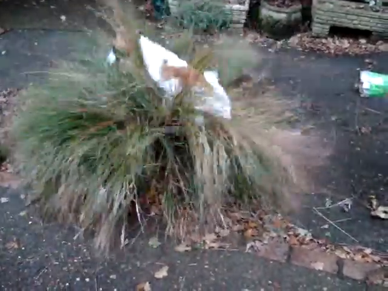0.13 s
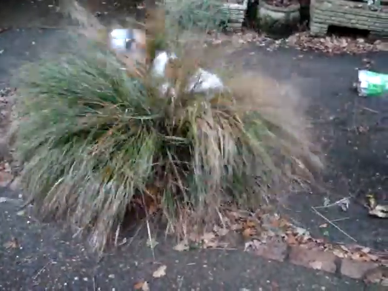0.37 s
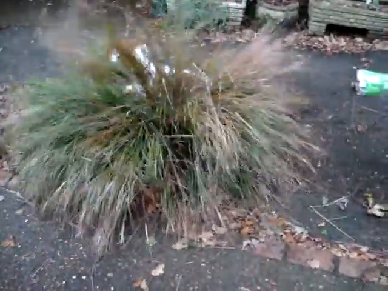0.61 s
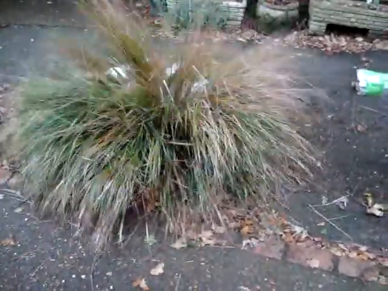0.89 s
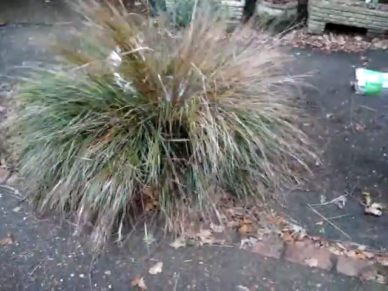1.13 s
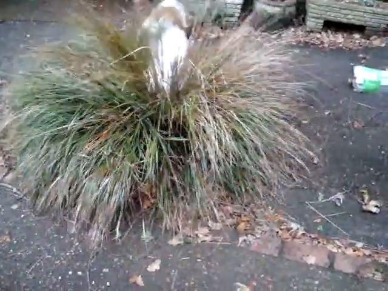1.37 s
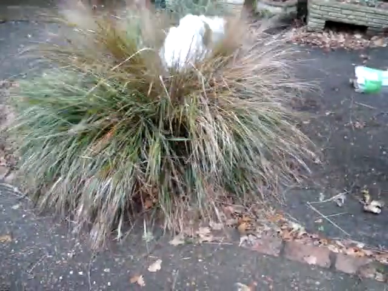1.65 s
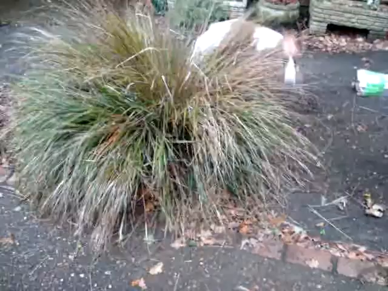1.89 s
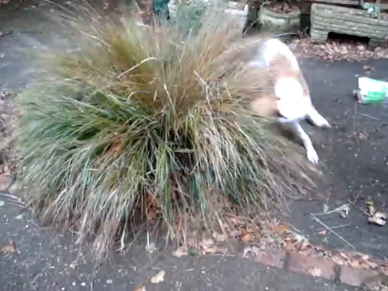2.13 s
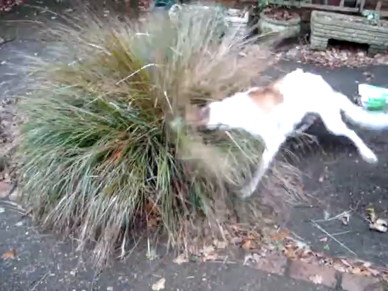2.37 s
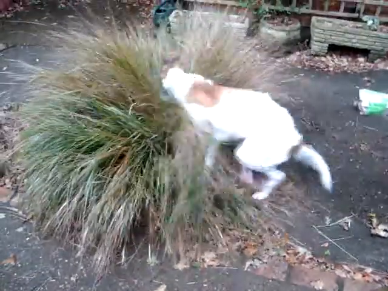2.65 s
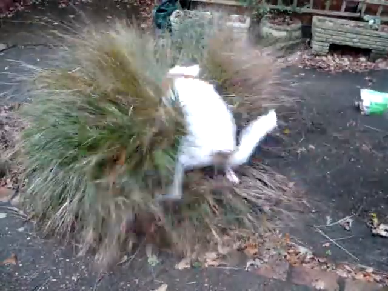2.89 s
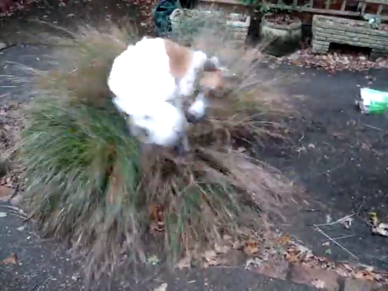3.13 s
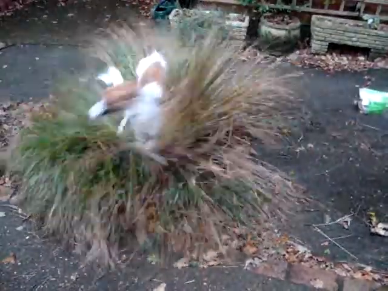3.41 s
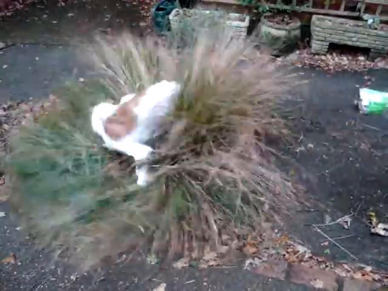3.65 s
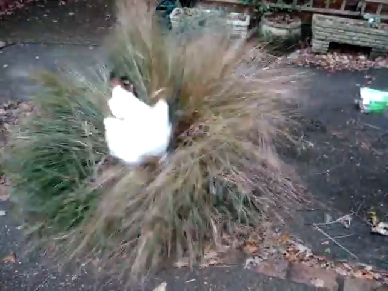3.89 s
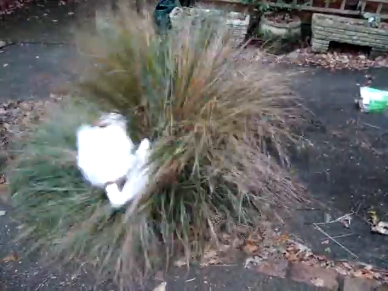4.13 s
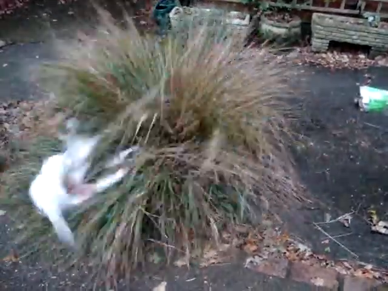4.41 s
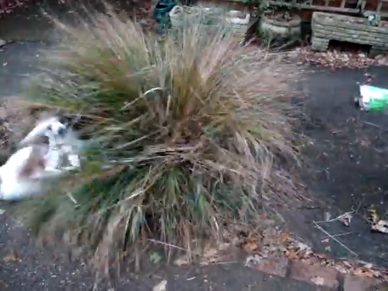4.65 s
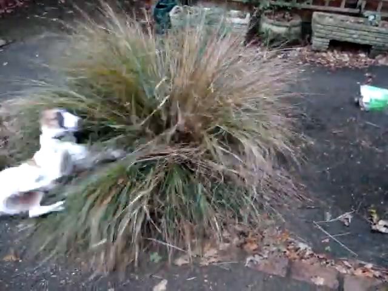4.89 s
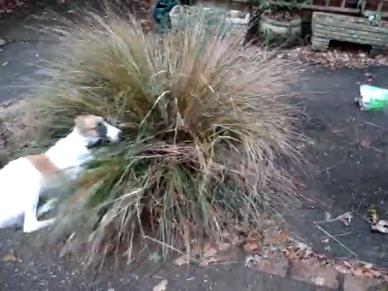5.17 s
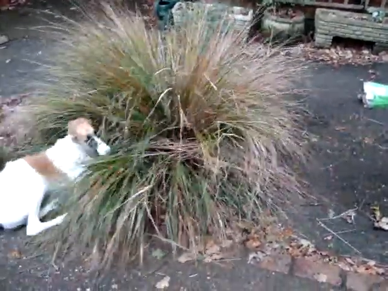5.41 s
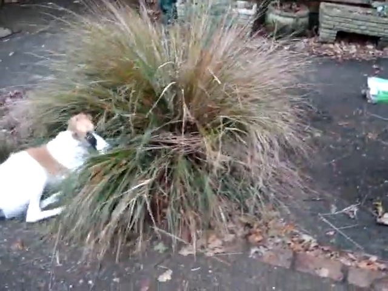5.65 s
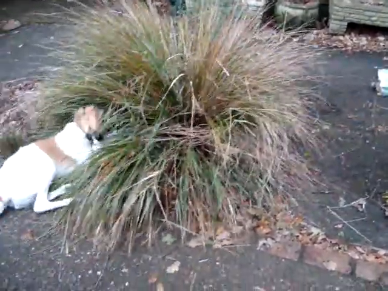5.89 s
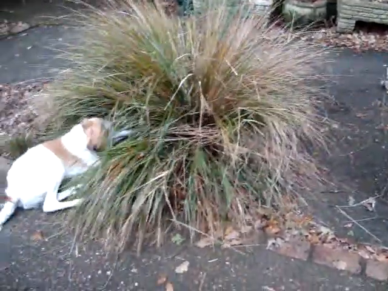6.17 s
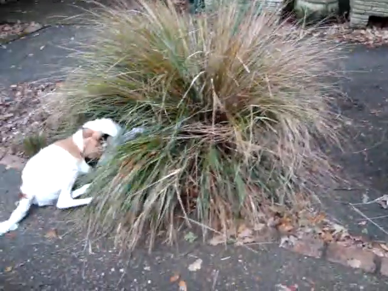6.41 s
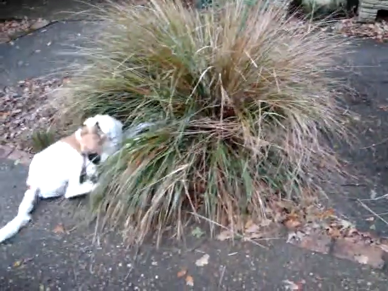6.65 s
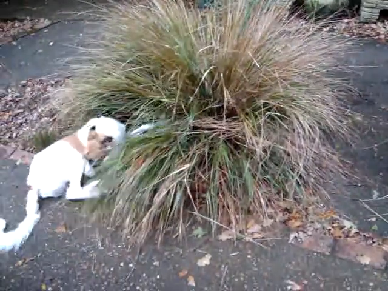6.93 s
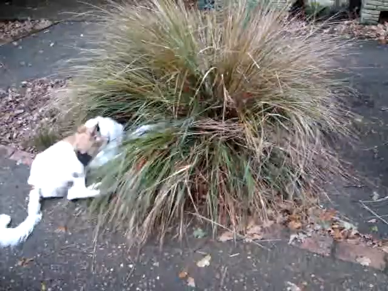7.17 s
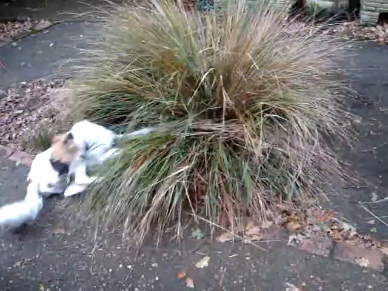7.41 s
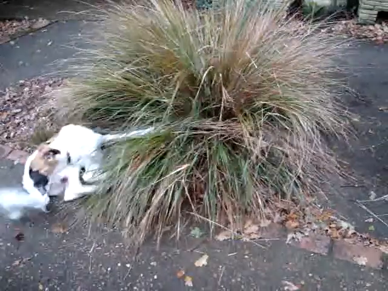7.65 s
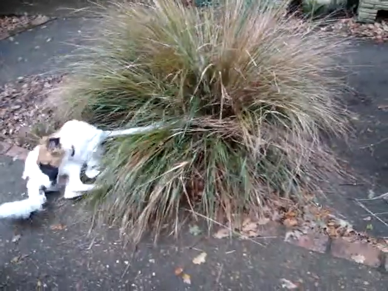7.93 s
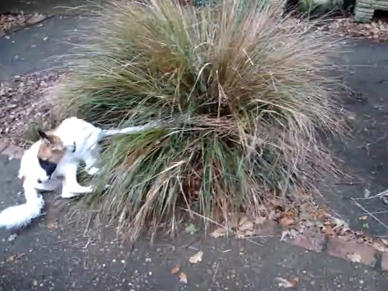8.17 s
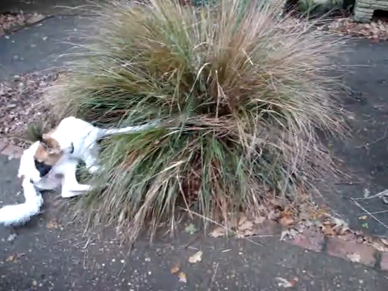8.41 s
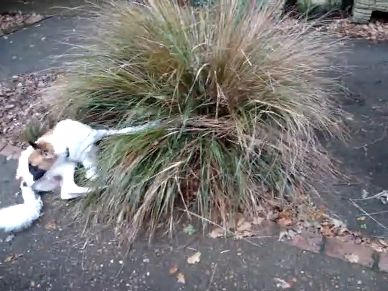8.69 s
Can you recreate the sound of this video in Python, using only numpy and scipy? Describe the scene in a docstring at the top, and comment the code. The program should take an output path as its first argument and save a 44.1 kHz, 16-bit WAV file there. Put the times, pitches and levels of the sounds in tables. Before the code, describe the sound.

A dog romps in long dry grass: bright papery sweeps, snapping stalks and soft thuds, a heavier thump, then faint rustles over distant traffic.

```python
"""In a paved garden a young dog thrashes and rolls through a clump of long dry grass, then tugs at it lightly.
Blades tick and swish and stems crunch: sparse ticks over hiss, given a colour and swelling with each sweep.
Paws and body thud (short pressure cycles with echoes), stalks snap or briefly swish (noise bursts), fibres
click (single cycles). The dog grunts once, hoarsely (pulses and breath through throat resonances). Shaped noise
makes the scuffing on the paving, the far traffic and the hiss; one small microphone hears it all."""
import sys
import numpy as np
from scipy import signal
from scipy.io import wavfile
from scipy.ndimage import uniform_filter1d

SR = 44100
rng = np.random.default_rng(int(sys.argv[2]) if len(sys.argv) > 2 else 0)


def gain_from_decibels(decibels):
    """Convert decibel values to linear amplitude factors."""
    exponent = np.asarray(decibels, float) / 20
    return 10 ** exponent


def store_pcm(level_fs):
    """Save levels as 16-bit WAV."""
    pcm = np.round(np.clip(level_fs, -1, 1) * 32767).astype(np.int16)
    wavfile.write(sys.argv[1], SR, np.atleast_2d(pcm).T)


N = 388068  # length in samples, 8.8 s
EDGE_HZ = 10170  # upper limit of the sound


def evened(x):
    """Scales to rms 1."""
    return x / np.sqrt(np.mean(x ** 2) + 1e-20)


def follow(points, t):
    """Reads the second column of a (time, value) table at the times t."""
    return np.interp(t, *np.transpose(points))


def read(points, hz):
    """Reads a spectrum on a log-frequency axis."""
    f, value = np.transpose(points)
    return np.interp(np.log(hz + 1), np.log(f + 1), value)


def add(mix, s, sound):
    """Mixes a sound in at time s."""
    part = mix[round(s * SR):][:len(sound)]
    part += sound[:len(part)]


def resonate(x, hz, width):
    """One resonance: shifts the pitch hz down to zero, smooths there and shifts back."""
    turn = np.exp(2j * np.pi * hz * np.arange(len(x)) / SR)
    r = np.exp(-np.pi * width / SR)
    return 2 * (turn * signal.lfilter([1 - r], [1, -r], x / turn)).real


def resonate_twice(x, hz, width):
    """Two equal resonances in a row, for steeper sides."""
    return resonate(resonate(x, hz, width), hz, width)


def ticks(per_s, spread_db, share):
    """Sparse ticks of uneven size, with this share of the power, over a smooth hiss of countless smaller ones."""
    size = gain_from_decibels(spread_db * np.minimum(rng.exponential(1, N), 3.5)) * (rng.random(N) < per_s / SR)
    sparse = evened(size * rng.choice([-1., 1.], N))
    return np.sqrt(share) * sparse + np.sqrt(1 - share) * rng.standard_normal(N)


def coloured(x, shape, patchy_db, flicker_db, tilt=0, ring_db=0, size=256):
    """Gives x a spectrum, drifting patches and a flicker shared by all pitches; the whole has rms 1."""
    ring_hz, ring_octaves = 4250, .24  # where dry blades ring and how widely
    hz, t, z = signal.stft(x, SR, nperseg=size, noverlap=size * 3 // 4)
    patches = rng.standard_normal((len(t), len(hz))).T
    patches = uniform_filter1d(patches, size=5, axis=0)
    patches = evened(uniform_filter1d(patches, size=24, axis=1))
    # sudden rises, slower falls
    flicker = evened(signal.lfilter([1], [1, -.9], rng.exponential(1, len(t)) ** 2 - 2))

    slope = np.interp(t * SR, np.arange(N), tilt * np.ones(N)) * np.log2(hz / 4000 + .01)[:, None]
    ring = np.exp(-(np.log2(hz / ring_hz + .01) / ring_octaves) ** 2)[:, None]
    slope += np.interp(t * SR, np.arange(N), ring_db * np.ones(N)) * ring
    gain = gain_from_decibels(read(shape, hz)[:, None] + slope) * (hz < EDGE_HZ)[:, None]
    gain /= np.sqrt((gain ** 2).mean(0))  # a change of colour leaves the loudness alone
    z = z * gain * gain_from_decibels(patchy_db * patches + flicker_db * flicker)
    return evened(signal.istft(z, SR, nperseg=size, noverlap=size * 3 // 4)[1][:N])


def garden():
    """Far traffic and microphone hiss as shaped noise, with a narrow low drone that comes and goes."""
    # spectrum of far traffic and hiss, shape only: [f/Hz, level per Hz/dB]
    air_shape = [(15, -50), (25, -21.5), (134, -8.5), (216, -6.5), (414, 0), (574, 3), (719, 0), (795, 3.5),
                 (1070, 3), (1490, -2.5), (2650, -7), (5620, -12.5), (7220, -10.5), (10000, -38),
                 (13000, -29), (22000, -120)]
    # level of the far low drone: [t/s, level/dB]
    drone_levels = [(0.0, -79), (.44, -82), (1.57, -74), (1.9, -76), (2.43, -72), (3.01, -89), (4.53, -86),
                    (4.68, -75.5), (8.8, -79.5)]
    air = gain_from_decibels(-52.5) * coloured(rng.standard_normal(N), air_shape, 0.96, .3, size=2048)
    drone = evened(resonate_twice(rng.standard_normal(N), hz=65, width=22))
    return air + gain_from_decibels(follow(drone_levels, np.arange(N) / SR)) * drone


def scuffing():
    """Scuffing on the paving: low, sparse ticks and hiss that swell and fade."""
    # spectrum of the scuffing, shape only: [f/Hz, level per Hz/dB]
    ground_shape = [(30, -14), (100, -11), (200, 1), (300, 4), (450, -9), (900, -33)]
    # level of the scuffing: [t/s, level/dB]
    scuff_levels = [(0.0, -76), (.6, -67), (1.49, -59), (1.86, -66), (2.15, -54.5), (2.5, -60.5),
                    (3.0, -70), (4.1, -73), (4.85, -61), (5.3, -70), (7.45, -64), (7.7, -71.5), (8.8, -62)]
    ground = coloured(ticks(60, 4.3, share=0.33), ground_shape, 1.3, .6, size=1024)
    return gain_from_decibels(follow(scuff_levels, np.arange(N) / SR)) * ground


def grunt():
    """A short hoarse grunt: uneven pulses and breath through the resonances of the throat."""
    # course of the grunt: [t/s, level/dB, mean pulse rate/Hz]
    grunt_course = [(7.235, -59, 112), (7.26, -44, 125), (7.3, -45, 167), (7.325, -49, 115),
                    (7.38, -52, 100)]
    # resonances of the throat, each passed twice: [f/Hz, width of one pass/Hz, level among them/dB]
    throat_tones = [(475, 76, 0), (1040, 270, -1), (1350, 230, 0)]
    s, db, rate = np.transpose(grunt_course)
    t = np.arange(s[0], s[-1], 1 / SR)
    unevenness = 1 + 2.74 * uniform_filter1d(rng.standard_normal(len(t)), size=200)
    turns = np.cumsum(np.interp(t, s, rate) * unevenness) / SR
    pulses = evened(np.diff(np.floor(turns), prepend=0))  # one pulse at each whole turn
    drive = pulses + 0.59 * rng.standard_normal(len(t))
    voice = sum(gain_from_decibels(d) * evened(resonate_twice(drive, hz, width)) for hz, width, d in throat_tones)
    out = np.zeros(N)
    add(out, s[0], gain_from_decibels(np.interp(t, s, db)) * evened(voice))
    return out


def thuds():
    """A soft blow on hard ground is one or two cycles of pressure, dip in the middle; the walls return it."""
    # paws and body on the ground: [t/s, peak level before echoes/dB, f/Hz]
    blow_list = [(.3143, -60, 80), (.6395, -50, 111), (.7896, -56, 110), (.8633, -41, 262),
                 (0.9377, -24.5, 583), (1.272, -31.5, 398), (1.283, -44, 112), (1.501, -37.5, 426),
                 (1.5383, -53, 70), (1.6227, -28.5, 880), (1.637, -43, 172), (1.6883, -35, 490),
                 (2.0327, -29.5, 610), (2.0765, -32, 497), (2.1696, -29, 850), (2.3691, -31, 475),
                 (2.4168, -54, 80), (2.507, -59, 90), (2.552, -34, 650), (2.588, -35, 650),
                 (2.7093, -57, 85), (2.9653, -42, 516), (4.2181, -36, 550), (4.4086, -47, 560),
                 (4.7047, -16.5, 447), (5.3814, -39, 714), (5.7102, -41, 646), (6.3947, -43, 486),
                 (8.3279, -46, 700), (8.659, -46, 228), (8.701, -55, 201)]
    # echoes off paving edge and walls: [delay/ms, level/dB]
    wall_list = [(7.4, -14), (19, -16), (33, -22)]
    out = np.zeros(N)
    for s, db, hz in blow_list:
        ms = 3.03 * (500 / hz) ** 0.85  # length scale: lower blows last longer
        t = np.arange(-2 * ms / 1000, 2 * ms / 1000, 1 / SR)
        phase = 1000 * t / ms
        press = np.exp(-np.where(t < 0, 7, 2.2) * phase ** 2)  # lands faster than it lets go
        cycles = np.cos(2 * np.pi * hz * t * (1 - 0.22 * phase))  # pitch sags
        add(out, s + t[0], -gain_from_decibels(db) * press * cycles)
    echoes = np.zeros(SR // 20)
    echoes[0] = 1  # the direct sound
    for ms, db in wall_list:
        echoes[round(ms * SR / 1000)] = gain_from_decibels(db)
    return signal.oaconvolve(out, echoes)[:N]


def clicks():
    """A parting fibre clicks for barely one cycle, so it spreads wide; push and pull cancel to leave little bass."""
    # fibres that part with one dry click: [t/s, level before push and pull are balanced/dB, f/Hz]
    click_list = [(0.8637, -19, 2800), (2.0776, -21, 5000), (2.186, -13, 5000), (2.189, -17, 6000),
                  (2.1992, -10, 4800), (2.2144, -11, 6000), (2.5112, -22, 5000), (2.7814, -8, 3600),
                  (3.3456, -18, 4000), (3.5167, -21, 3500), (6.0208, -23.5, 1800), (6.0587, -24.5, 1590),
                  (7.5199, -30, 4500)]
    half_cycles = 0.4  # half-length of a click in cycles of its pitch
    out, t = np.zeros(N), np.arange(-64, 64) / SR
    for s, db, hz in click_list:
        window = np.exp(-(hz * t / half_cycles) ** 2)
        cycle = window * np.cos(2 * np.pi * hz * t)
        balanced = cycle - window * cycle.sum() / window.sum()
        add(out, s + t[0], -gain_from_decibels(db) * balanced)
    return out


def snaps():
    """Stalks snap as short noise bursts; the longest rows are brief swishes, which start softly."""
    # snaps and brief swishes, resonance passed twice: [t/s, peak level/dB, f/Hz, width of one pass/Hz, decay/ms]
    burst_list = [(.8626, -23, 2600, 2500, 5.3), (0.936, -22.5, 2500, 2500, 1.4),
                  (.9392, -22, 1800, 1600, 2.9), (1.273, -16.5, 5200, 5970, 6.8),
                  (1.527, -23.5, 3000, 3000, 6.6), (1.56, -23, 5000, 5000, 6), (1.624, -24, 1500, 2000, 5),
                  (1.647, -19, 4500, 5000, 7), (1.75, -26, 4000, 5000, 11), (2.075, -24, 5450, 3000, 3),
                  (2.12, -18.5, 4500, 5000, 4), (2.244, -25, 2170, 500, 5), (2.256, -20, 2700, 1200, 4.8),
                  (2.366, -17, 2300, 2500, 5.7), (2.551, -18, 3300, 4000, 8),
                  (2.7798, -13.5, 3300, 2200, 1.8), (2.832, -20, 3200, 2000, 4),
                  (2.962, -22, 1280, 1200, 11), (4.7033, -26, 905, 800, 1.9), (5.047, -23.5, 1200, 3000, 3),
                  (6.021, -17.5, 6930, 2600, 1.4), (6.0592, -28.5, 2200, 3500, 1.9),
                  (7.96, -45, 3460, 900, 33), (8.554, -40.5, 1880, 600, 8)]
    out, t_ms = np.zeros(N), np.arange(-2048, 4096) * 1000 / SR
    for s, db, hz, width, decay in burst_list:
        noise = np.diff(rng.standard_normal(len(t_ms) + 1))
        fibres = resonate_twice(noise, hz, width)
        rise = 0.2 * decay ** 1.56  # in ms: the longer the burst, the softer its start
        burst = fibres * np.exp(np.where(t_ms < 0, t_ms / rise, -t_ms / decay))
        add(out, s + t_ms[0] / 1000, gain_from_decibels(db) * burst / abs(burst).max())
    return out


def sweeps():
    """Loudness of blades and of stems: each lunge, roll or tug adds its power to an unbroken rustle."""
    # unbroken rustle between the swishes: [t/s, level/dB]
    rustle_levels = [(0.0, -33.5), (.7, -35.5), (1.05, -40), (1.6, -36.5), (2.0, -33.5), (2.4, -39),
                     (2.62, -42), (3.1, -36), (3.8, -42), (4.1, -36), (4.5, -34.5), (4.76, -42),
                     (5.27, -42.5), (5.41, -52), (6.1, -55.5), (6.6, -53.5), (7.3, -52), (7.76, -50.5),
                     (8.16, -58.5), (8.8, -59)]
    # lunges, rolls and tugs, rise and fall to 10 dB down:
    # [peak t/s, level/dB, rise/s, fall/s, weight on the stems as crunch over swish/dB]
    swish_list = [(.05, -30, 0.22, 0.094, -9.5), (.45, -34, 0.084, 0.073, -9.5),
                  (.55, -33, 0.062, 0.11, -9), (.86, -33.5, 0.18, 0.15, -10),
                  (1.15, -36.5, 0.14, 0.16, -6.5), (1.28, -34, 0.027, 0.086, -7.5),
                  (1.64, -31.5, 0.36, 0.22, -10), (2.12, -36.5, 0.07, .06, -6.5),
                  (2.23, -35.5, 0.079, 0.12, -7.5), (2.38, -31, 0.072, 0.33, -12),
                  (2.545, -31, 0.022, 0.043, -4.5), (2.74, -30.5, 0.089, 0.088, -10),
                  (2.86, -29, 0.077, 0.055, -7.5), (2.96, -28, 0.064, 0.071, -11),
                  (3.22, -33, 0.19, .1, -11), (3.33, -28.5, 0.079, 0.17, -10),
                  (3.49, -29.5, 0.16, 0.046, -14.5), (3.7, -28.5, 0.17, 0.055, -15.5),
                  (3.88, -31, 0.16, 0.18, -13), (4.22, -32, 0.048, 0.13, -9.5),
                  (4.41, -32.5, 0.1, 0.1, -10), (4.6, -42.5, 0.18, 0.21, -5.5),
                  (5.02, -35.5, 0.14, 0.12, -6.5), (5.2, -37, .05, 0.044, -10),
                  (5.93, -42.5, 0.048, 0.07, -6.5), (6.22, -50, 0.041, 0.17, -9),
                  (6.42, -48.5, .05, 0.078, -21), (6.69, -46, 0.1, 0.15, -6), (6.93, -45, .09, 0.097, -7),
                  (7.42, -44.5, .14, 0.18, -6), (7.65, -42.5, 0.22, 0.074, -11.5),
                  (8.55, -52, 0.033, 0.072, -14), (8.66, -58.5, 0.043, 0.091, 3.5)]
    t = np.arange(0, N, 32) / SR
    rustle_db = follow(rustle_levels, t)
    swish = gain_from_decibels(2 * rustle_db)  # powers, hence the factor 2
    # stems are 12 dB under the blades in a rustle of -35 dB; a fainter rustle has relatively more of them
    crunch = swish * gain_from_decibels(2 * (-12 - 0.47 * (rustle_db + 35)))
    for s, db, rise, fall, crunch_db in swish_list:
        # a higher exponent would hold the top longer
        drop_db = 10 * (abs(t - s) / np.where(t < s, rise, fall)) ** 2.25
        power = gain_from_decibels(2 * (db - drop_db))
        swish = swish + power
        crunch = crunch + power * gain_from_decibels(2 * crunch_db)
    every = np.arange(N) / SR
    return np.interp(every, t, np.sqrt(swish)), np.interp(every, t, np.sqrt(crunch))


def blades():
    """Dry blades tick against each other and the coat: thousands of ticks a second, bright and papery."""
    # spectrum of the blades, shape only: [f/Hz, level per Hz/dB]
    blade_shape = [(600, -35), (1200, -9.5), (1700, -5), (2500, -1), (4000, 0), (5500, -1.5), (8000, 1.5),
                   (9800, 0), (12000, -84)]
    # changing colour of the blades: [t/s, brightness/dB per octave, papery ring/dB]
    blade_colour = [(0.0, -.4, 4), (.6, -0.2, 0.5), (1.5, -0.2, .3), (2.25, -.6, 5), (3.0, 0.4, 3.5),
                    (3.65, -0.4, -0.5), (4.85, 0.95, -1), (5.96, -2.5, 0), (6.4, -0.1, -0.5),
                    (7.45, -1.5, -0.5), (8.5, 2.8, 3.5), (8.8, 0, -1)]
    s, bright, ring = np.transpose(blade_colour)
    t = np.arange(N) / SR
    return coloured(ticks(3000, 2.7, share=0.37), blade_shape, 1.24, 0.62,
                    tilt=np.interp(t, s, bright), ring_db=np.interp(t, s, ring))


def stems():
    """Stems crunch lower and more sparsely than the blades, under the dog's weight."""
    # spectrum of the stems, shape only: [f/Hz, level per Hz/dB]
    stem_shape = [(100, -44), (250, -20.5), (400, -5.5), (600, 0.5), (1200, 3.5), (1700, -2.5), (3000, -3),
                  (6000, -42.5)]
    return coloured(ticks(900, 3.2, share=0.35), stem_shape, 0.98, 1.0, size=512)


def grass():
    """The same sweeps drive swishing blades and crunching stems, each by its own loudness."""
    swish, crunch = sweeps()
    return swish * blades() + crunch * stems()


def scene():
    """One microphone feeds both channels."""
    mix = garden() + scuffing() + grunt() + thuds() + clicks() + snaps() + grass()
    return np.tile(mix, (2, 1))


def low_pass(x):
    """Removes everything above the highest recorded frequency."""
    return signal.sosfilt(signal.butter(12, 11280, fs=SR, output="sos"), x)


def record(dry):
    """The small microphone loses deep bass below about 35 Hz; a steep filter then limits the treble."""
    dry = signal.lfilter(*signal.butter(1, 35, "high", fs=SR), dry)
    edge = signal.firwin(1023, EDGE_HZ, window=("kaiser", 9), fs=SR)
    mix = signal.oaconvolve(dry, edge[None], "same")
    return low_pass(mix)


dry = scene()
out = record(dry)
store_pcm(out)
```